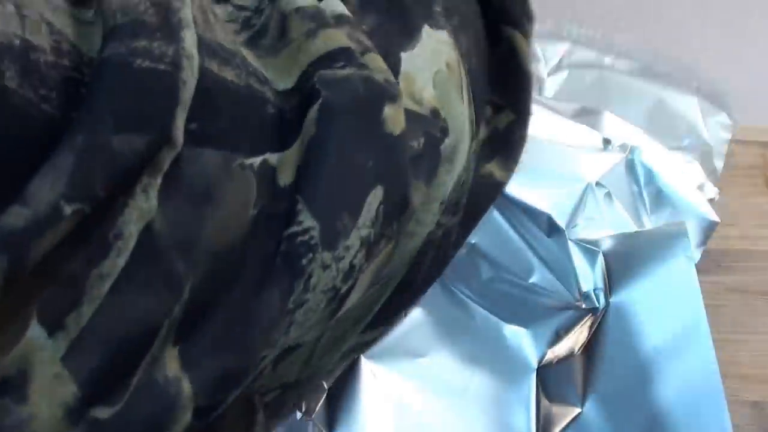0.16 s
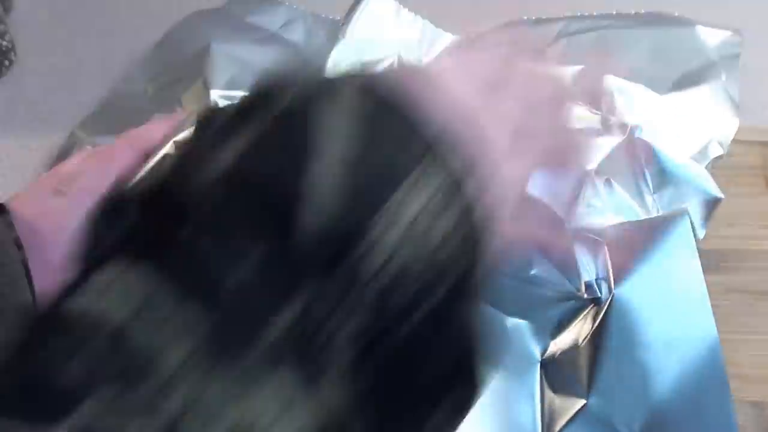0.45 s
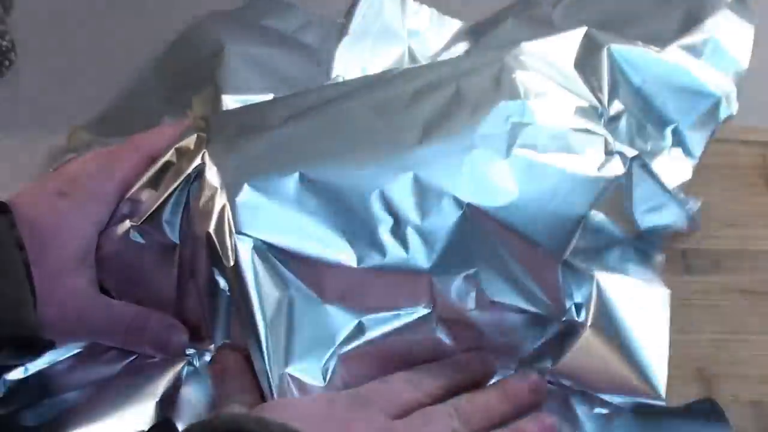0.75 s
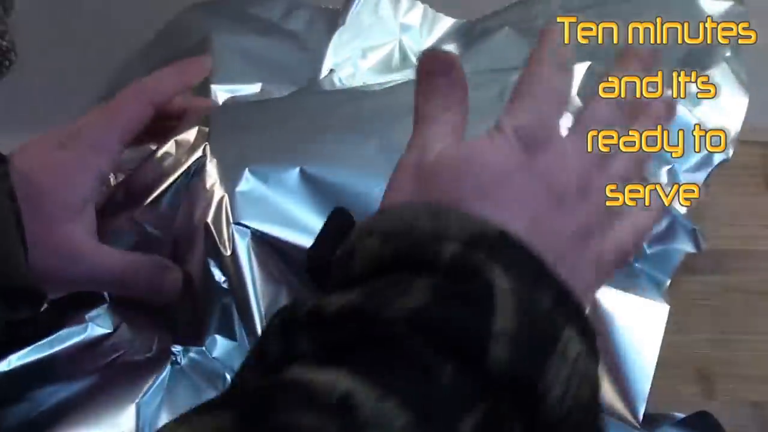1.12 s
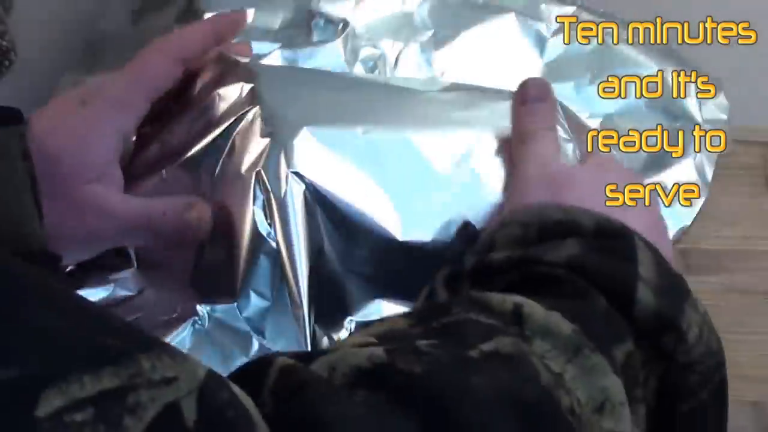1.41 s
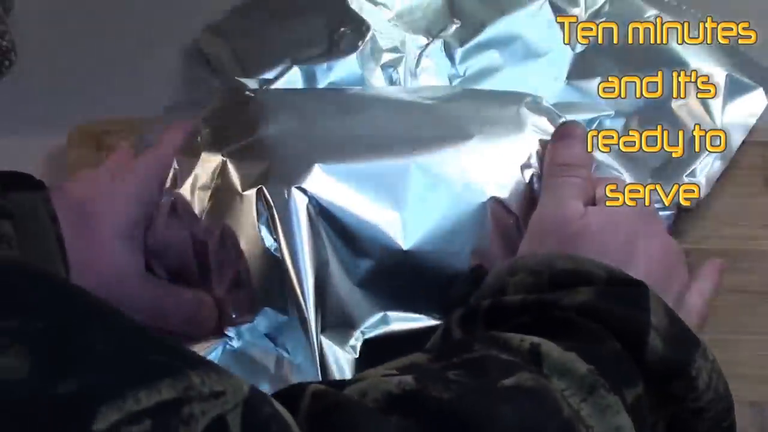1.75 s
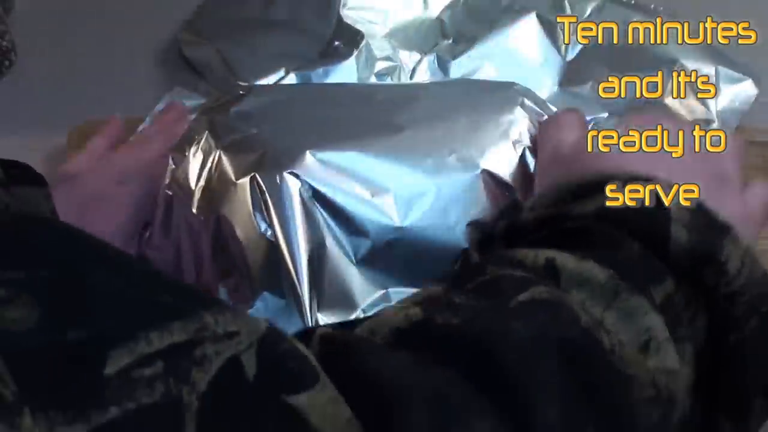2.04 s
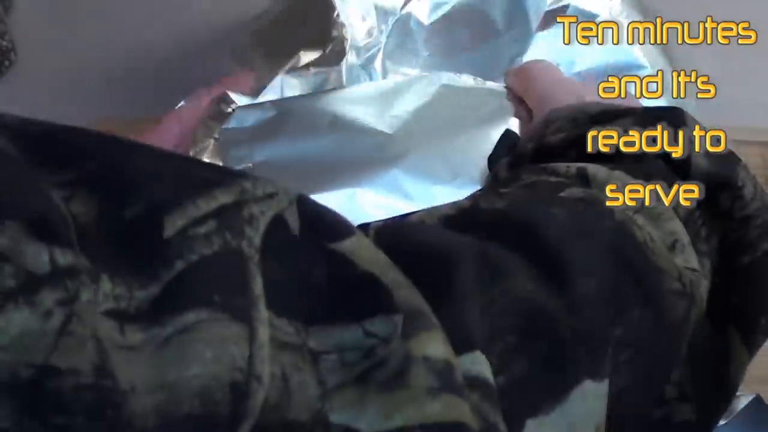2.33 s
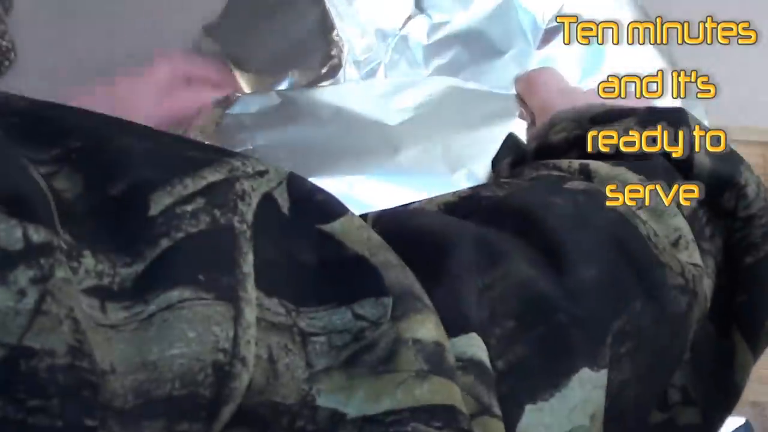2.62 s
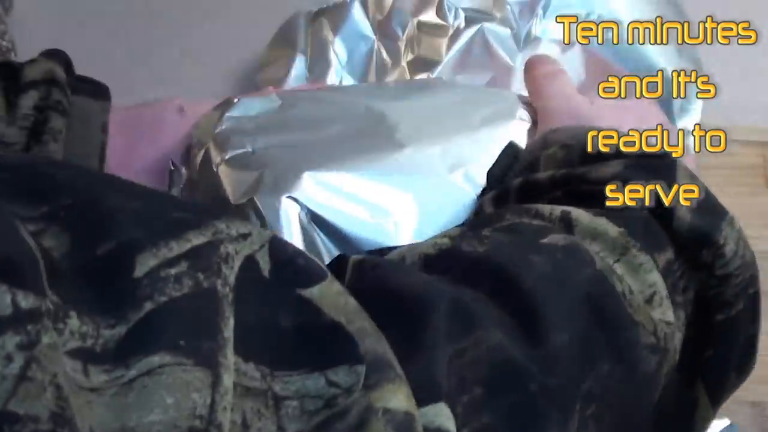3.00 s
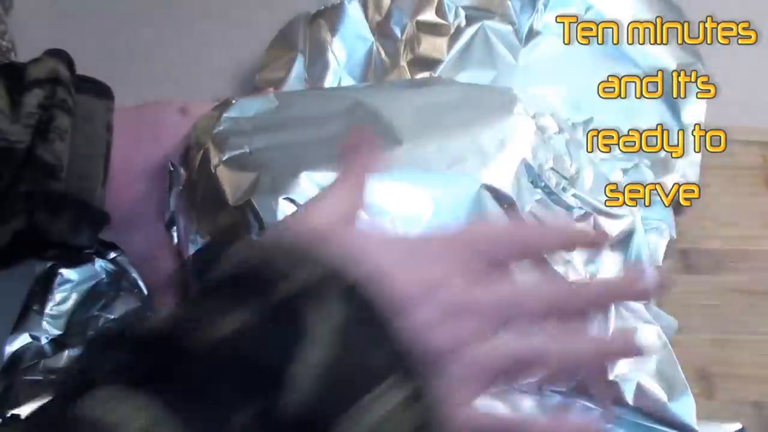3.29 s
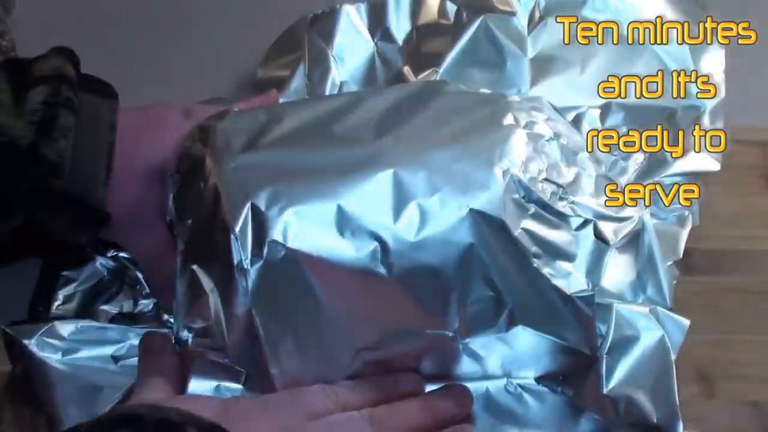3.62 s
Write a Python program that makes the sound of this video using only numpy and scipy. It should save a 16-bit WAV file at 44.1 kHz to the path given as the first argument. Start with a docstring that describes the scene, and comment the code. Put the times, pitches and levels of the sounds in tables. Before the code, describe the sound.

Hands crumple and press crisp metal foil close to the microphone in a small room, with dense bright crackle, loud snaps, soft rustle and short echoes, two brief lulls, and faint room noise with hum beneath.

```python
"""Hands crumple and press a sheet of aluminium foil in a small kitchen, nearly in mono.
Crackle starts at once, almost stops after half a second, then returns with loud snaps and dull thumps.
It keeps up, with short dips, thins out shortly after 3.2 s, then bursts out again and lasts to the end.
Crackle and rustle are many dying noise bursts; single facets ring, tiny creases tick, bumps are sagging tones.
Echoes of the kitchen follow every sound; a faint room noise and mains hum lie below throughout."""
import sys
import numpy as np
from scipy import signal
from scipy.io import wavfile

SR = 44100
rng = np.random.default_rng(int(sys.argv[2]) if len(sys.argv) > 2 else 0)


def volts(x):
    """Linear amplitude factor 10**(x/20) for a level x in dB, scalar or array-like."""
    e = np.asarray(x, float) / 20
    return 10 ** e


def store_pcm(level_fs):
    """Save levels as 16-bit WAV."""
    pcm = np.round(np.clip(level_fs, -1, 1) * 32767).astype(np.int16)
    wavfile.write(sys.argv[1], SR, np.atleast_2d(pcm).T)


N = 165375  # samples, 3.75 s

# How hard the hands work: [t/s, crackle level/dB, dull rustle level/dB]
HAND_WORK = [(0.0, -14, -29), (0.05, -23, -39), (0.08, -19.5, -31.5), (0.15, -17, -33.5),
             (0.2, -16.5, -33.5), (0.28, -24.5, -34), (0.302, -18, -35), (0.5, -46, -42), (0.56, -44, -98),
             (0.63, -39.5, -55), (0.636, -13.5, -33), (0.66, -18, -29), (0.84, -18, -36),
             (0.89, -24, -36.5), (0.99, -24, -36.5), (1.05, -21.5, -40.5), (1.07, -20, -45),
             (1.13, -31.5, -43), (1.16, -19.5, -36.5), (1.22, -48, -48), (1.24, -25.5, -32.5),
             (1.271, -15.5, -33.5), (1.39, -21, -28.5), (1.41, -15.5, -25), (1.55, -17.5, -33.5),
             (1.62, -18, -30), (1.79, -18, -33.5), (1.86, -17, -25), (1.9, -20.5, -29), (2.08, -18, -34),
             (2.12, -28.5, -36), (2.18, -17.5, -26), (2.41, -16.5, -33.5), (2.51, -25, -33),
             (2.58, -28.5, -36), (2.68, -31, -31.5), (2.71, -17.5, -31), (2.77, -28, -44.5),
             (2.83, -18.5, -31), (2.89, -16.5, -41), (2.93, -17, -26.5), (2.99, -19.5, -36),
             (3.04, -16, -29.5), (3.08, -29, -36), (3.12, -25, -35), (3.26, -34, -37.5), (3.31, -77, -47),
             (3.33, -39, -60), (3.35, -42, -44), (3.38, -34, -39), (3.402, -17.5, -22.5), (3.5, -17, -34.5),
             (3.59, -18, -30), (3.61, -23, -34.5), (3.75, -22, -37)]
# Single loud buckles: [t/s, level/dB, time to die by 60 dB near 4530 Hz/s]
LOUD_BUCKLES = [(0.064, -6.5, 0.081), (0.294, -9, 0.11), (0.4383, -18, 0.073), (0.5736, -26, 0.071),
                (0.5858, -15, 0.1), (0.637, -9, 0.06), (0.858, -11, 0.068), (0.8786, -3.5, 0.13),
                (0.9346, -4.5, 0.037), (0.9532, -3.5, 0.036), (0.9737, -6.5, 0.06), (1.012, -6.5, 0.1),
                (1.058, -9, 0.085), (1.143, -7, 0.065), (1.1554, -13, 0.064), (1.1855, -8, 0.075),
                (1.231, -16.5, 0.1), (1.2685, -22, 0.099), (1.553, -14, 0.055), (2.147, -6.5, 0.096),
                (2.4714, -4, 0.028), (2.5208, -4, 0.14), (2.587, -4.5, 0.047), (2.632, -13.5, 0.06),
                (2.709, -12, 0.14), (2.7771, -6.5, 0.11), (3.105, -3.5, 0.048), (3.1224, -12, 0.06),
                (3.1414, -10, 0.06), (3.1744, -11, 0.06), (3.2036, -7, 0.072), (3.2263, -15, 0.053),
                (3.255, -15.5, 0.12), (3.3255, -18, 0.065), (3.3553, -25, 0.068), (3.3967, -5, 0.12),
                (3.5194, -8.5, 0.045), (3.5753, -4.5, 0.084), (3.622, -5, 0.052), (3.6412, -4.5, 0.057),
                (3.6666, -5.5, 0.051), (3.6965, -15, 0.047), (3.7064, -15, 0.048), (3.718, -5.5, 0.06),
                (3.7434, -5, 0.06)]
# Tone colour of the crackle: [f/Hz, level/dB per Hz]
CRACKLE_COLOUR = [(1060, -52), (1800, -9), (2410, -13), (3060, -5.5), (4290, -6), (5700, -1), (8360, -2),
                  (9590, -4.5), (14600, -19), (15300, -17), (16000, -23)]
# Tone colour of the rustle: [f/Hz, level/dB per Hz]
RUSTLE_COLOUR = [(35, -59), (60, -64), (165, -18), (478, -7.5), (953, -1.5), (1700, -2), (2380, -8),
                 (2800, -2.5), (3640, -4.5), (6160, -120)]
# How long a buckle rings: [f/Hz, time to die by 60 dB/s]
RING_TIME = [(100, 0.05), (1000, 0.11), (6000, 0.14), (14000, 0.06)]
# Extra tilt of the crackle as other parts of the sheet are worked: [t/s, tilt/dB per octave]
SHEET_TILT = [(0, 0.5), (.4, 1), (.7, 3), (1.1, 0.5), (1.9, 0.5), (2.3, 0.5), (2.7, 1.5), (3.1, 0),
              (3.75, 1)]
# Larger panels pop, or the hands bump the wrapped dish: [t/s, level/dB, f/Hz]
PANEL_BUMPS = [(0.139, -9, 1460), (.14, -16.5, 710), (0.669, -17, 1110), (0.685, -37, 133),
               (0.953, -9.5, 1760), (1.554, -15, 1680), (1.661, -13, 1800), (2.147, -32, 204),
               (2.18, -21, 560), (2.302, -31, 160), (3.399, -12, 1510), (3.4, -40, 218), (3.439, -15, 1070),
               (3.568, -19.5, 780), (3.586, -9.5, 1900), (3.599, -40, 109), (3.615, -14, 1300),
               (3.646, -15, 1510)]
# Tone colour of the room noise: [f/Hz, level/dB per Hz]
ROOM_COLOUR = [(40, -30), (120, -10.5), (500, -4.5), (1500, -4.5), (6000, -37), (10000, -15), (15000, -44)]
# Stereo width, as a colour for the side echoes: [f/Hz, level/dB]
SIDE_COLOUR = [(60, -27), (110, -41), (200, -43), (380, -42), (700, -38), (1290, -25), (2380, -20),
               (4400, -18), (8120, -14), (15000, -23)]

# Typical rates, before clumping and lighter work change them
BUCKLES_PER_S, SIZE_SPREAD_DB, COLOUR_SPREAD_DB = 900, 2.4, 3.5
FLEXES_PER_S, FLEX_SPREAD_DB, FLEX_COLOUR_DB = 310, 3.5, -0.5
CLUMP_DB, CLUMP_HZ = 1.16, 24.7  # buckles set each other off in clumps
THINNING = 0.4  # dB of buckle rate lost for each dB of work lighter than the median
BRIGHTEN_DB = 0.2666  # harder work tilts the crackle up: dB per octave for each dB of level
WANDER_DB, WANDER_HZ = 1.5, 4  # each band swells and sinks as the sheet folds
FACETS_PER_S, RING_CYCLES, RINGING_DB = 300, 40, -11.5  # cycles to die by 60 dB; level beside the bursts
TICKS_PER_S, TICK_SPREAD_DB, TICK_DB, TICK_HZ = 250, 2.5, -13, (4100, 12000)
SNAP_COLOUR_DB, SNAP_RISE_S = 2.0, 0.001
CRACK_DB, CRACK_T60_S = -1, 0.012  # the first instant of a loud buckle
THUMP_CYCLES, THUMP_RISE_S = 12, 0.0007  # cycles of a tone midway (in octaves) to 400 Hz
THUMP_SAG = 0.073  # share of its cycles the tone has lost by the time it has died by 60 dB
KITCHEN_T60_S, KITCHEN_DB, WALL_CUT_HZ = 0.65, -10, 4500
MOVE_S = 0.12  # the sounding spot of the sheet moves on after this time
AIR_DB, HUM_HZ, HUM_DB = -43.5, 120, -65.5
LEAN_RIGHT, LEAN_HZ = 0.12, (400, 6950)
MIC_LOW_HZ, CEILING = 79, 0.68


def rms_one(x):
    """Scale to rms 1 (rms is the average strength of a sound)."""
    return x / np.sqrt(np.mean(x ** 2) + 1e-20)


def at_hz(points, hz):
    """Read a table between its points, with equal steps per octave."""
    table = np.array(points)
    return np.interp(np.log(hz), np.log(table[:, 0]), table[:, 1])


def foil_colour_db(hz):
    """Colour of the whole foil: the crackle, or the rustle 8 dB down where that is stronger."""
    return max(at_hz(CRACKLE_COLOUR, hz), at_hz(RUSTLE_COLOUR, hz) - 8)


def drift(rate_hz):
    """Slow random wandering around 0 with spread 1, worked out at every 40th sample."""
    r = np.exp(-80 * np.pi * rate_hz / SR)
    chance = rng.standard_normal(N // 40 + 2002)
    slow = signal.lfilter([1], [1, -2 * r, r * r], chance)[2000:]
    return np.interp(np.arange(N) / 40, np.arange(len(slow)), rms_one(slow))


def bands(low_hz, count):
    """Filters that each pass a third of an octave, with their centres in Hz."""
    edges = np.minimum(low_hz * 2 ** (np.arange(count + 1) / 3), 0.45 * SR)
    return [(np.sqrt(a * b), signal.butter(2, [a, b], "band", fs=SR, output="sos"))
            for a, b in zip(edges, edges[1:])]


def coloured(noises, colour, low_hz, count):
    """Colour noise band by band; neighbouring bands take turns between two noises."""
    out = 0
    for k, (hz, sos) in enumerate(bands(low_hz, count)):
        out = out + volts(at_hz(colour, hz)) * signal.sosfilt(sos, noises[k % 2])
    return out


def chance_clicks(per_s, spread_db, clump):
    """Random moments with many small and few large sizes."""
    born = np.flatnonzero(rng.random(N) < per_s * clump / SR)
    size_db = spread_db * np.minimum(rng.exponential(1, N), 5)
    return born, volts(size_db)[born]


def bursts(spectrum, low_hz, per_s, spread_db, colour_db, clump, tilt_db, count):
    """Each buckle or flex starts a dying burst of noise in every band, with its own colour; rms 1."""
    born, size = chance_clicks(per_s, spread_db, clump)
    white, out = rng.standard_normal((2, N)), 0
    for k, (hz, sos) in enumerate(bands(low_hz, count)):
        own_colour = volts(colour_db * rng.standard_normal(N)[born])
        power = np.zeros(N)
        power[born] = (size * own_colour) ** 2
        # The power of all bursts adds up and dies by 60 dB in the ring time
        power = signal.lfilter([1], [1, -volts(-120 / (at_hz(RING_TIME, hz) * SR))], power)
        noise = signal.sosfilt(sos, white[k % 2] * np.sqrt(power / power.mean()))
        tilt = tilt_db * np.log2(hz / 6000)
        out = out + volts(at_hz(spectrum, hz) + tilt + WANDER_DB * drift(WANDER_HZ)) * noise
    return rms_one(out)


def facets(clump):
    """Small flat facets ring for some tens of cycles, each at one of 150 pitches; rms 1."""
    born, size = chance_clicks(FACETS_PER_S, SIZE_SPREAD_DB, clump)
    dealt, out = rng.integers(0, 150, N)[born], 0
    for k, hz in enumerate(np.geomspace(700, 11000, num=150)):
        clicks = np.full(N, 1e-18)
        clicks[born[dealt == k]] = size[dealt == k]
        r = volts(-60 * hz / (RING_CYCLES * SR))  # what is left after one sample
        w = 2 * np.pi * hz / SR
        ring = signal.lfilter([0, np.sin(w)], [1, -2 * r * np.cos(w), r * r], clicks)
        out = out + volts(foil_colour_db(hz)) * hz * ring
    return rms_one(out)


def ticks(clump):
    """Tiny creases flip with a bare click, up or down, kept to a band of treble; rms 1."""
    born, size = chance_clicks(TICKS_PER_S, TICK_SPREAD_DB, clump)
    clicks = np.full(N, 1e-18)
    clicks[born] = size * rng.choice([-1, 1], N)[born]
    return rms_one(signal.sosfilt(signal.butter(2, TICK_HZ, "band", fs=SR, output="sos"), clicks))


def snaps():
    """A large buckle lets go one sudden burst over many bands, its highest treble dying sooner."""
    white, out, t = rng.standard_normal((2, N)), 0, np.arange(SR // 4) / SR
    colour = rng.standard_normal((len(LOUD_BUCKLES), 20))
    for k, (hz, sos) in enumerate(bands(1030, count=12)):
        shape = np.zeros(N + len(t))
        for (s, db, t60), own in zip(LOUD_BUCKLES, colour):
            ring_s = max(t60, 0.01) * at_hz(RING_TIME, hz) / at_hz(RING_TIME, 4530)
            ring = volts(-60 * t / ring_s) * (1 - np.exp(-t / SNAP_RISE_S))
            crack = volts(CRACK_DB - 60 * t / CRACK_T60_S)
            start = int(s * SR)
            shape[start:start + len(t)] += volts(db + SNAP_COLOUR_DB * own[k]) * (ring + crack)
        out = out + volts(foil_colour_db(hz) - 3) * signal.sosfilt(sos, white[k % 2] * shape[:N])
    return out


def thumps():
    """Each bump or popping panel rings briefly at one pitch that sags as the panel settles."""
    out, t = np.zeros(N + SR), np.arange(SR // 4) / SR
    for s, db, hz in PANEL_BUMPS:
        t60 = THUMP_CYCLES / np.sqrt(hz * 400)
        fade = volts(db - 60 * t / t60) * (1 - np.exp(-t / THUMP_RISE_S))
        cycles = hz * t * (1 - THUMP_SAG * np.minimum(t / t60, 1))
        start = int(s * SR)
        out[start:start + len(t)] += fade * np.sin(2 * np.pi * cycles)
    return out[:N]


def kitchen(x):
    """Three unrelated tails of dying, dulled echoes, drawn anew as the sounding spot moves."""
    hop, t = int(MOVE_S * SR), np.arange(SR // 3) / SR
    out, window = np.zeros((3, N + SR)), signal.get_window("hann", 2 * hop)
    x = np.concatenate([np.zeros(hop), x, np.zeros(2 * hop)])
    dull = np.exp(-2 * np.pi * WALL_CUT_HZ / SR)
    for i in range(0, N + hop, hop):
        echoes = signal.lfilter([1 - dull], [1, -dull], rng.standard_normal((3, len(t))))
        tails = echoes * volts(-60 * t / KITCHEN_T60_S)
        tails = tails / np.sqrt(np.sum(tails[0] ** 2))
        # Overlapping pieces fade into each other
        wet = signal.fftconvolve([x[i:i + 2 * hop] * window], tails, axes=1)
        out[:, i:i + wet.shape[1]] += wet
    return out[:, hop:hop + N]


def air():
    """Coloured noise for the room, and a faint sine for the mains hum, drifting in level."""
    noise = rms_one(coloured(rng.standard_normal((2, N)), ROOM_COLOUR, 30.53, count=27))
    hum = np.sin(2 * np.pi * HUM_HZ * np.arange(N) / SR)
    return volts(AIR_DB) * noise + volts(HUM_DB + 2.0 * drift(4.6)) * hum


def scene():
    """Foil a little to the right, room in the middle; the room's other tails give the width."""
    s, crackle_db, rustle_db = np.transpose(HAND_WORK)
    t, clump = np.arange(N) / SR, volts(CLUMP_DB * drift(CLUMP_HZ))
    crackle_db, rustle_db = np.interp(t, s, crackle_db), np.interp(t, s, rustle_db)
    effort_db = crackle_db - np.median(crackle_db)
    tilt_db = BRIGHTEN_DB * effort_db + np.interp(t, *np.transpose(SHEET_TILT))
    busy = volts(THINNING * np.clip(effort_db, -30, 0))
    rate = clump * busy

    crackle = bursts(CRACKLE_COLOUR, 1574, BUCKLES_PER_S, SIZE_SPREAD_DB, COLOUR_SPREAD_DB,
                     rate, tilt_db, count=10)
    crackle = crackle + volts(RINGING_DB) * facets(rate) + volts(TICK_DB) * ticks(rate)
    crackle = rms_one(crackle) / np.sqrt(busy)  # fewer buckles must not also lower the level
    rustle = bursts(RUSTLE_COLOUR, 86.1, FLEXES_PER_S, FLEX_SPREAD_DB, FLEX_COLOUR_DB,
                    clump, 0, count=16)
    foil = volts(crackle_db) * crackle + volts(rustle_db) * rustle + snaps() + thumps()

    wet, *other = kitchen(foil)
    mid = foil + volts(KITCHEN_DB) * wet + air()
    other = np.array(other) * np.std(mid) / np.std(other)
    side = coloured(other, SIDE_COLOUR, 116.0, count=21)
    lean = signal.sosfilt(signal.butter(2, LEAN_HZ, "band", fs=SR, output="sos"), mid)
    side = side - LEAN_RIGHT * lean
    return np.array([mid + side, mid - side])  # left, right


def low_pass(x):
    """Removes everything above the highest recorded frequency."""
    return signal.sosfilt(signal.butter(12, 16470, fs=SR, output="sos"), x)


def record(dry):
    """The microphone rounds off peaks and loses deep bass."""
    rounded = CEILING * np.tanh(dry / CEILING)
    mix = signal.sosfilt(signal.butter(2, MIC_LOW_HZ, "high", fs=SR, output="sos"), rounded)
    return low_pass(mix)


dry = scene()
out = record(dry)
store_pcm(out)
```